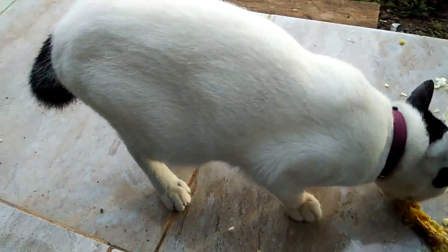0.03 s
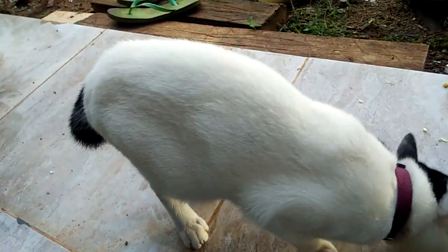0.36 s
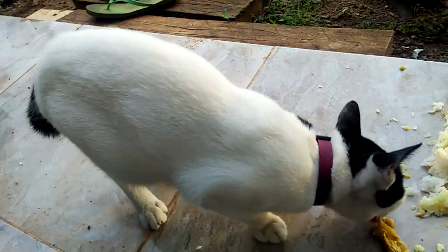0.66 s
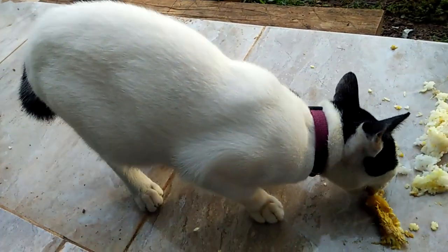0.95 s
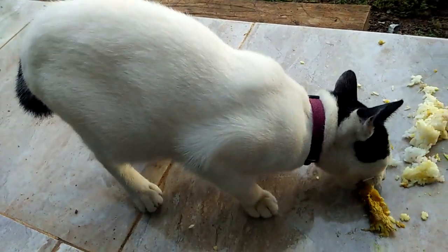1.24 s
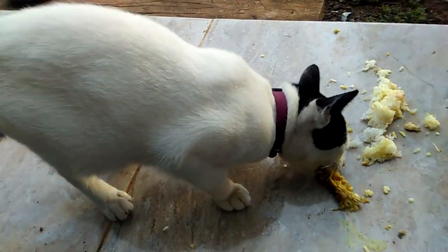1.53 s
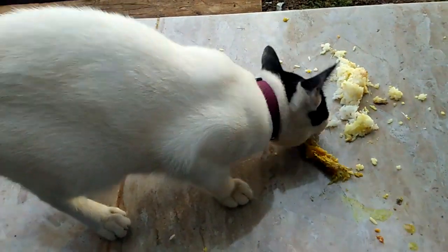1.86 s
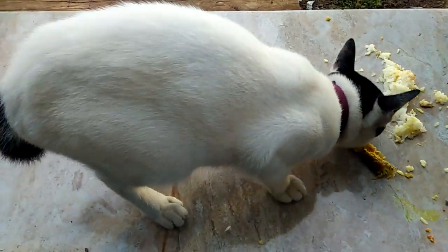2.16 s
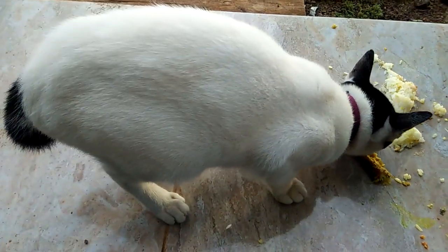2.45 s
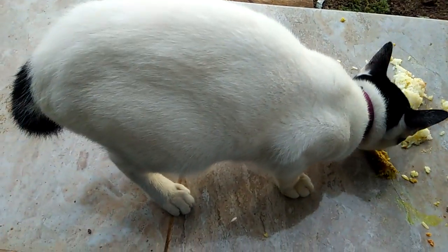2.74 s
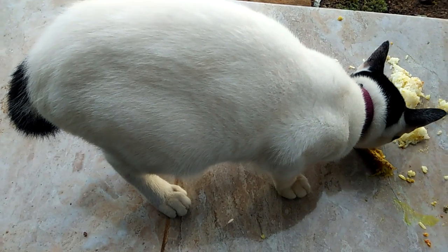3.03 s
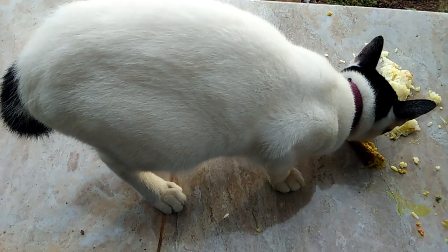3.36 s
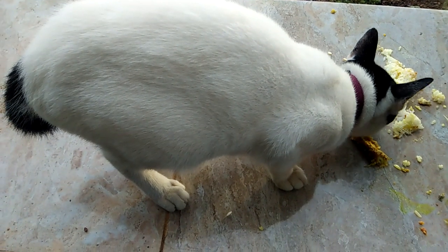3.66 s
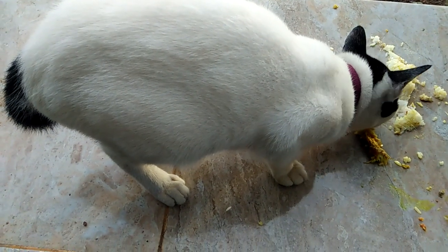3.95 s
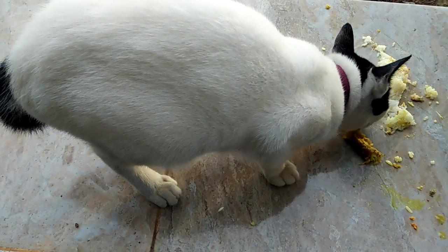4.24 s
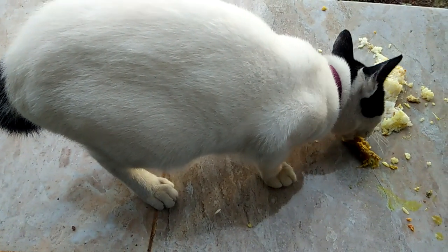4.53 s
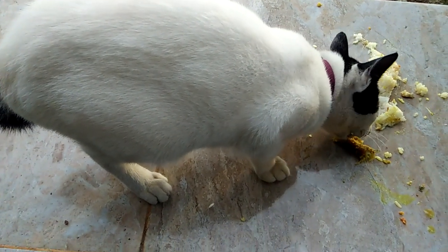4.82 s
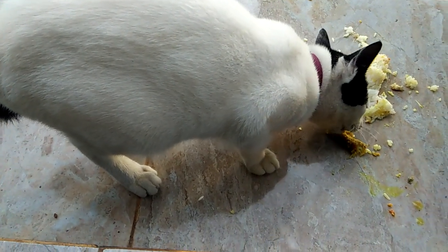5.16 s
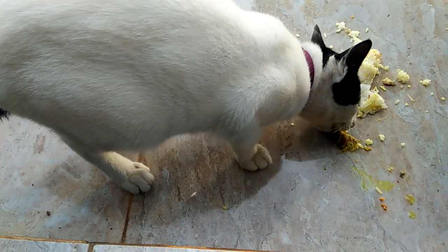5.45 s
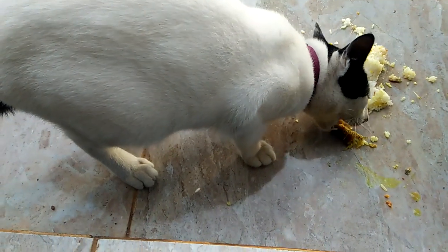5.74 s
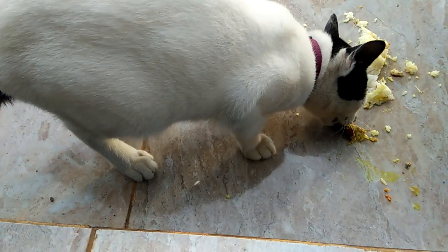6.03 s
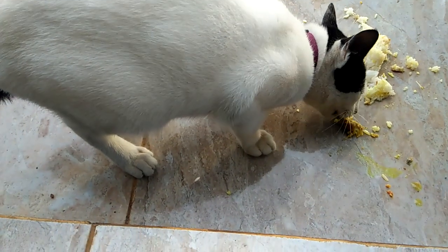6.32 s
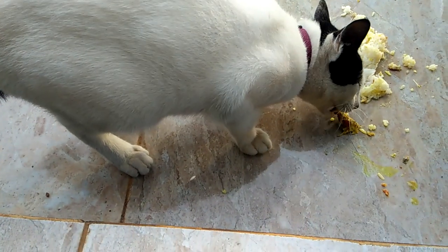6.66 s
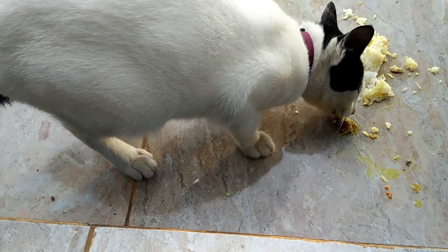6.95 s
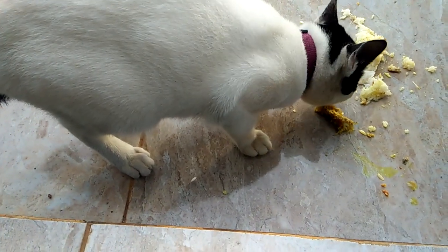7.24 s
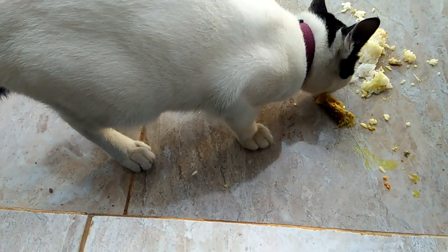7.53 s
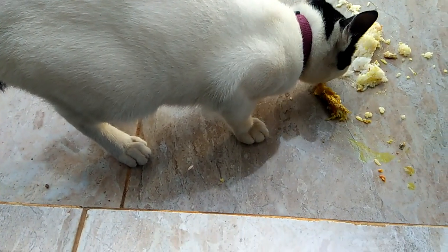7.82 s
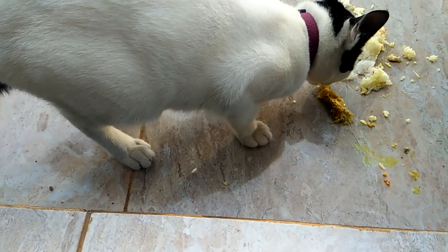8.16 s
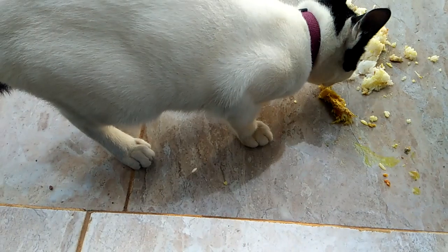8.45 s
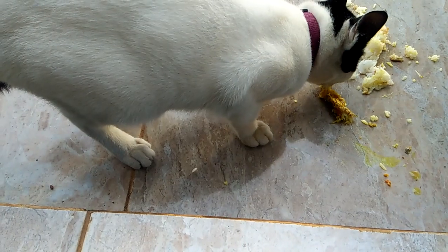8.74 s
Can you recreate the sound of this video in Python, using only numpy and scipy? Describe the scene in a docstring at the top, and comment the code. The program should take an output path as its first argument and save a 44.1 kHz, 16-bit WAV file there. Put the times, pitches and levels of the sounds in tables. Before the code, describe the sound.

Close, wet smacking and nibbling of a cat eating outdoors, with thin bird whistles, quick chirps and a distant rooster.

```python
"""Cat eating corn on a porch

A cat nibbles a corn cob: kernel skins crack in small wet ticks and the lips pop softly. Then comes a
quick run of loud, close tongue smacks, each a wet seal tearing open and ringing the mouth over tiles.
Around the yard two small birds whistle and chip, and a far rooster crows in hoarse, arching tones.
Underneath lie a faint hoot, thin insects, a low rumble and a hiss that swells with every bright sound."""
import sys
import numpy as np
from scipy import signal
from scipy.fft import rfft, irfft, next_fast_len
from scipy.io import wavfile
from scipy.ndimage import uniform_filter1d, minimum_filter1d

SR = 44100
rng = np.random.default_rng(int(sys.argv[2]) if len(sys.argv) > 2 else 0)


def wav_out(sig):
    """Save sig, one row per channel (or a flat mono array), as 16-bit PCM at SR to the path in sys.argv[1]."""
    wavfile.write(sys.argv[1], SR, np.round(np.clip(np.atleast_2d(sig).T, -1, 1) * 32767).astype(np.int16))


N = 387374
TIME = np.arange(N) / SR

# Levels in the tables are relative: each layer has its own gain in the mix.
# Tongue smacks: (snap time [s], lead-in [s], hold [s], level [dB], middle resonance [Hz],
# upper resonance [Hz], low resonance against the middle one [dB], brightness [dB])
TONGUE_SMACKS = [(4.058, 0.00084, 0.012, -27, 3400, 7900, -9.5, 10.5),
                 (4.2431, 0.0017, 0.0087, -37.5, 2670, 7450, -8.5, 19),
                 (4.4126, .008, 0.0073, -36.5, 2590, 7760, -0.5, 9),
                 (4.582, 0.0046, 0.0085, -33, 2470, 7840, -6, -1),
                 (4.75, .004, 0.0047, -36, 2370, 7660, -3.5, 3.5),
                 (4.918, 0.00079, 0.0095, -35.5, 2580, 7460, -2.5, 9),
                 (5.1035, 0.0096, 0.0057, -30, 2510, 6700, -7.5, -4.5),
                 (5.29, 0.012, 0.0041, -31, 2600, 6500, -20.5, -9.5),
                 (5.462, .012, 0.0067, -30, 2660, 6030, -7, -27.5),
                 (5.6295, .003, 0.0045, -36, 2810, 6630, -6.5, 0),
                 (5.812, .007, 0.0049, -32, 2740, 6740, -9, -16),
                 (5.997, 0.00086, 0.0048, -43, 2980, 6950, -3.5, -6.5),
                 (6.093, 0.00028, 0.0013, -47.5, 2350, 8060, -5, 14),
                 (6.211, .007, 0.0037, -32, 2640, 6950, -7, -13.5),
                 (6.407, 0.0094, .003, -35, 2710, 6950, -7.5, 0),
                 (6.5884, 0.0049, 0.0017, -37.5, 2540, 7000, -6, 5.5),
                 (6.781, 0.0053, 0.0022, -35.5, 2820, 7300, -9, -8),
                 (6.981, 0, 0.013, -34.5, 2900, 7300, -46, 1),
                 (7.2, 0.0098, 0.0036, -38.5, 2930, 7400, -12, 3),
                 (7.46, .008, 0.0049, -34.5, 3110, 6960, -15, -17)]
# Low, middle, upper and top resonance of the mouth: (width [Hz])
MOUTH_WIDTHS = [756, 700, 1190, 1370]
# Wide, wet splash of a smack: (frequency [Hz], level [dB])
SPLASH_EQ = [(150, -10), (330, -23), (430, -5), (800, -4.5), (1300, -4.5), (2000, 4.5), (3000, 2),
             (4500, -1), (7500, 5.5), (10000, -9), (14000, -9)]
# Teeth on kernels: (time [s], bright level [dB], dull level [dB])
KERNEL_TICKS = [(0.2279, -50.5, -75), (0.5758, -49.5, -76), (1.1958, -59, -68), (1.5225, -47.5, -57),
                (1.87, -63, -69), (1.8995, -55, -70), (2.225, -60, -74), (2.3612, -48.5, -50),
                (2.4132, -38, -36), (2.723, -63, -80), (3.0423, -51.5, -75), (3.3497, -53.5, -55.5),
                (3.892, -60.5, -74.5), (4.0298, -52.5, -58.5), (4.049, -45.5, -50.5), (4.228, -47, -59),
                (4.9908, -41, -62.5), (5.027, -39.5, -61), (5.054, -47, -66), (5.338, -52, -55),
                (5.647, -43, -39.5), (6.736, -47.5, -62), (7.13, -49, -72), (7.162, -46.5, -74),
                (7.8376, -58.5, -75), (8.0984, -61.5, -70), (8.74, -71, -66)]
# Bright edge and dull body of a tick: (frequency [Hz], level [dB])
TICK_BRIGHT_EQ = [(3000, -20), (5000, -12), (7000, -4.5), (8900, 7.5), (11000, -3), (13000, -7),
                  (14500, -16)]
TICK_DULL_EQ = [(300, -25), (900, -2), (1500, 8), (2100, 0.5), (2700, -3), (3800, -6), (5500, -5.5)]
# Soft pops of the chewing mouth: (time [s], resonance [Hz], level [dB])
LIP_POPS = [(.985, 1530, -65.5), (1.149, 3940, -79), (1.86, 1940, -62.5), (2.972, 3730, -82),
            (3.047, 3660, -74.5), (3.129, 3500, -78.5), (3.33, 1540, -68), (4.765, 4200, -59.5),
            (5.019, 1400, -60.5), (5.184, 3160, -68.5), (7.831, 2400, -76), (8.089, 3100, -66.5)]
# First bird, three phrases of thin whistles: (time [s], top pitch [Hz], level [dB])
WHISTLE_NOTES = [(0.143, 8950, -54.5), (.304, 8750, -49.5), (0.503, 8110, -49), (.713, 7640, -54.5),
                 (0.928, 7560, -59.5), (1.14, 7100, -66), (5.199, 9200, -50), (5.386, 8550, -47),
                 (5.559, 8250, -54), (6.26, 9380, -35.5), (6.44, 9060, -35), (6.595, 8710, -34.5),
                 (6.74, 8630, -34), (6.891, 8610, -31), (7.042, 8610, -33), (7.186, 8650, -32.5),
                 (7.331, 8600, -33), (7.48, 8660, -36)]
# A louder whistle is shorter and falls farther: (level [dB], length [s], fall [share of top pitch])
WHISTLE_BY_LEVEL = [(-54, 0.11, 0.079), (-37, .044, 0.23)]
# Second bird, quick chips: (time [s], top pitch [Hz], level [dB])
CHIP_NOTES = [(5.396, 4500, -65.5), (5.433, 5050, -57), (5.468, 5140, -42), (5.506, 5280, -38.5),
              (5.541, 5310, -37.5), (5.751, 5170, -39), (5.79, 5190, -40), (5.825, 5330, -37),
              (5.863, 5320, -39)]
# Rooster syllables, one whole crow and the start of the next:
# (time [s], length [s], top pitch [Hz], place of the pitch peak [0-1], fundamental [dB], octave [dB])
CROW_SYLLABLES = [(1.07, 0.27, 666, 0.3, -53, -56), (1.34, .23, 739.3, 0.42, -43.5, -56),
                  (1.578, 0.25, 746.3, 0.57, -45, -54), (1.779, .33, 746, .15, -50.5, -52.5),
                  (2.207, .42, 713.4, .45, -54, -56), (8.678, 0.27, 602, 0.6, -52.5, -58)]
# Course of the low hoot: (time [s], pitch [Hz], level [dB])
HOOT_CURVE = [(.15, 290, -97), (.3, 303, -76), (.42, 297, -63), (.58, 293.5, -61), (.68, 293, -58.5),
              (.76, 282, -74)]
# Noise beds of insects, rumble, neighbourhood air and fine hiss: (frequency [Hz], level [dB])
INSECT_EQ = [(3800, -34), (4400, -3), (4780, 0), (5150, -7.5), (5900, -32)]
RUMBLE_EQ = [(12, -56), (20, -34), (34, -23.5), (54, -3.5), (91, -4), (129, -1.5), (147, -3.5), (241, -21),
             (312, -15.5), (336, -26), (380, -42), (490, -85.5), (840, -120)]
AIR_EQ = [(220, -48.5), (370, -19), (430, -4), (693, -4), (750, -3), (1100, -7.5), (1340, -6),
          (3410, -24.5), (3730, -28.5), (4000, -26.5), (5200, -32), (8800, -120)]
HISS_EQ = [(1000, -55.5), (2800, -30), (3900, -26), (4750, -16.5), (5600, -19.5), (6400, -10.5),
           (6740, -0.5), (7100, -12.5), (8200, -6), (9150, 5.5), (10400, -8), (12400, -21.5), (13000, 0.5),
           (13400, -13.5), (14400, -14)]
# Fader rides of the rumble and the air: (time [s], level [dB])
RUMBLE_RIDE = [(0.0, -57), (0.02, -56), (0.59, -60), (0.61, -59), (0.83, -66), (0.88, -57.5), (2.64, -67),
               (3.76, -60), (3.99, -68.5), (4.01, -61), (4.15, -69.5), (5.72, -65), (5.84, -56.5),
               (5.97, -69), (8.39, -61), (8.78, -63.5)]
AIR_RIDE = [(0, -68.5), (1, -67.5), (2.9, -72), (3.7, -70), (4, -67.5), (6.8, -70), (7.1, -65.5),
            (7.4, -71.5), (8.78, -72.5)]
# How the hiss follows bright sounds: (treble level [dB], swell [dB])
SWELL_CURVE = [(-82.5, -16.5), (-62, -7), (-45.5, -2), (-25, -1)]
# Echo tail of the yard: (frequency [Hz], time to fall 60 dB [s])
YARD_DECAY = [(200, .4), (800, .55), (2800, .27), (5000, .34), (8000, .44), (14000, .22)]


def amp(db):
    """Decibels to gain."""
    return 10 ** (np.asarray(db) / 20)


def unit_rms(x):
    """Scales to rms 1."""
    return x / np.sqrt(np.mean(x ** 2) + 1e-20)


def at_hz(points, hz):
    """Reads a curve on a log-frequency axis."""
    f, value = np.transpose(points)
    return np.interp(np.log(hz + 1), np.log(f + 1), value)


def follow(rows):
    """The columns of a time curve at every sample."""
    s, *columns = np.transpose(rows)
    return [np.interp(TIME, s, c) for c in columns]


def add(mix, s, sound):
    """Mixes a sound in at time s."""
    part = mix[max(round(s * SR), 0):][:len(sound)]
    part += sound[:len(part)]


def stereo(mid, side):
    """Mid and side to left and right."""
    return mid + side * np.array([[1], [-1]])


def equalise(x, eq):
    """Minimum-phase EQ: nothing rings ahead of an attack."""
    log_gain = np.log(amp(at_hz(eq, abs(np.fft.fftfreq(2048, 1 / SR)))))
    taps = np.fft.ifft(np.exp(np.conj(signal.hilbert(log_gain)))).real
    return signal.oaconvolve(x, taps)[:len(x)]


def noise(eq):
    """Steady noise with the given spectrum, rms 1."""
    size = next_fast_len(N)
    gain = amp(at_hz(eq, np.fft.rfftfreq(size, 1 / SR)))
    return unit_rms(irfft(rfft(rng.standard_normal(size)) * gain, size)[:N])


def wander(rate_hz):
    """Random modulation up to the given rate, rms 1; it holds still past its last knot."""
    knots = rng.standard_normal(4000)
    return unit_rms(np.interp(2 * rate_hz * TIME, np.arange(len(knots)), knots))


def resonate(x, hz, width_hz):
    """A resonance applied twice, for steep skirts."""
    b, a = signal.iirpeak(min(hz, SR * .45), hz / width_hz, SR)
    return signal.lfilter(b, a, signal.lfilter(b, a, x))


def crackle(t, grain_db):
    """A wet film tearing: noise made of tiny bursts of uneven size."""
    grains = amp(grain_db * np.clip(rng.standard_normal(400), -2, 2))
    return rng.standard_normal(len(t)) * grains[np.arange(len(t)) // 16]


def tongue_smacks(rise_s=0.00021, snap_s=0.001, fall_s=0.0036, fizz_s=0.034, gain_db=-0.5):
    """Air leaks past the tongue, the seal tears open and the mouth rings; saliva fizzes on after."""
    out, size = np.zeros(N), 4410
    for s, lead, hold, db, middle_hz, upper_hz, low_db, bright_db in TONGUE_SMACKS:
        t = np.arange(size) / SR - lead
        after = np.maximum(t, 0)
        leak = amp(-7) * np.sqrt((t + lead) / (lead + 1e-4)) * (t < 0)
        tear = (1 - np.exp(-after / rise_s)) * np.exp(-np.maximum(t - hold, 0) / fall_s)
        snap = 1 + amp(-2.5) * np.exp(-after / snap_s)  # the first instant is the sharpest
        drive = crackle(t, grain_db=3.5) * (leak + tear * snap)
        fizz = crackle(t, grain_db=7) * amp(-19.5) * np.exp(-after / fizz_s) * (t > 0)
        low_hz = 1550 * (1 + 0.13 * rng.standard_normal())
        mouth = [(low_hz, low_db), (middle_hz, 0),
                 (upper_hz, 1 + 0.33 * bright_db), (1.41 * upper_hz, bright_db - 11.5)]
        ring = sum(amp(db + part_db) * unit_rms(resonate(drive, hz, width))
                   for (hz, part_db), width in zip(mouth, MOUTH_WIDTHS))
        splash = amp(-5) * ring.std() * unit_rms(equalise(drive + fizz, SPLASH_EQ))
        add(out, s - lead, (ring + splash) * np.sqrt(.01 * SR / size))  # levels count over 10 ms
    return amp(gain_db) * out


def kernel_ticks(crack_s=0.0051, wet_db=-23, wet_s=0.021):
    """A kernel skin breaks: a sharp tick and a short wet fizz."""
    out, t = np.zeros(N), np.arange(2205) / SR
    for s, bright_db, dull_db in KERNEL_TICKS:
        drive = crackle(t, grain_db=4) * (np.exp(-t / crack_s) + amp(wet_db) * np.exp(-t / wet_s))
        edge = amp(bright_db - 1) * unit_rms(equalise(drive, TICK_BRIGHT_EQ))
        body = amp(dull_db - 3) * unit_rms(equalise(drive, TICK_DULL_EQ))
        add(out, s, (edge + body) * np.sqrt(.005 / t[-1]))  # levels count over 5 ms
    return out


def lip_pops(length_s=0.035, width_hz=750):
    """Lips and tongue part softly and sound one resonance of the mouth."""
    out, u = np.zeros(N), np.linspace(0, 1, int(length_s * SR))
    for s, hz, db in LIP_POPS:
        parting = crackle(u, grain_db=3) * np.sin(np.pi * np.sqrt(u)) ** 2
        add(out, s, amp(db) * unit_rms(resonate(parting, hz, width_hz)))
    return out


def nibbles(per_s=36, gain_db=-58, spread_db=4, width_hz=1300, bands=9):
    """Moist chewing: a sprinkle of tiny, high clicks of different pitch."""
    out = np.zeros(N)
    for hz in np.linspace(7000, 12500, bands):
        hits = rng.random(N) < per_s / bands / SR
        sizes = amp(np.minimum(spread_db * rng.exponential(1, N), 15))
        out += resonate(hits * sizes, hz, width_hz) * SR / (np.pi * width_hz)
    return out * amp(gain_db)


def bird_whistles(crest=0.097, bend=1.9, waver=0.012, flutter_db=4):
    """A small bird's thin, fluttering notes: each lifts briefly to its top and bends down."""
    out = np.zeros(N)
    pitch_waver = 1 + waver * wander(310)
    flutter = amp(flutter_db * wander(140))
    levels, lengths, falls = np.transpose(WHISTLE_BY_LEVEL)
    for s, top_hz, db in WHISTLE_NOTES:
        u = np.linspace(0, 1, int(np.interp(db, levels, lengths) * SR))
        now = slice(int(s * SR), int(s * SR) + len(u))
        droop = np.interp(db, levels, falls) * abs((u - crest) / (1 - crest)) ** bend
        hz = top_hz * (1 - droop) * pitch_waver[now]
        envelope = np.sin(np.pi * u ** 0.81) * flutter[now]
        add(out, s, amp(db) * unit_rms(envelope * np.sin(2 * np.pi * np.cumsum(hz) / SR)))
    return out


def bird_chips(length_s=0.025, drop=0.2, linger=0.47, octave_db=-14, flutter_db=2):
    """A second bird's quick downward sweeps, lingering halfway, with a weak octave."""
    out, u = np.zeros(N), np.linspace(0, 1, int(length_s * SR))
    fall = u + linger * np.sin(2 * np.pi * u) / (2 * np.pi)
    for s, top_hz, db in CHIP_NOTES:
        phase = 2 * np.pi * np.cumsum(top_hz * (1 - drop * fall)) / SR
        tone = np.sin(phase) + amp(octave_db) * np.sin(2 * phase)
        add(out, s, amp(db) * unit_rms(np.sin(np.pi * u) * tone))
    return out * amp(flutter_db * wander(110))


def rooster(arch=0.0644, jitter=0.0317, rasp=0.6, attack_s=0.018, release_s=0.12, fade_db=-2):
    """Hoarse syllables that arch in pitch; only two harmonics carry across the distance."""
    out = np.zeros(N)
    unsteady = 1 + jitter * wander(60)
    uneven = amp(-13) * wander(80)  # uneven pulses put a weak tone between the harmonics
    throat = amp(-18) * unit_rms(resonate(rng.standard_normal(N), hz=1660, width_hz=800))
    for s, length, top_hz, peak, first_db, octave_db in CROW_SYLLABLES:
        now = (TIME >= s) & (TIME < s + length)
        t = TIME[now] - s
        hz = top_hz * (1 - arch * (2 * (t / length - peak)) ** 2)
        phase = 2 * np.pi * np.cumsum(hz * unsteady[now]) / SR
        upper = np.sin(2 * phase) + uneven[now] * np.sin(1.5 * phase) + throat[now]
        gate = np.minimum(np.minimum(t / attack_s, (length - t) / release_s), 1)
        envelope = gate * amp(fade_db * t / length)
        out[now] += envelope * (amp(first_db) * np.sin(phase) + amp(octave_db) * upper)
    return np.sqrt(2) * out * (1 + rasp * wander(150))


def hoot(jitter=0.046, flutter_db=3, fade_s=0.019):
    """A soft, unsteady far tone."""
    hz, db = follow(HOOT_CURVE)
    tone = np.sin(2 * np.pi * np.cumsum(hz * (1 + jitter * wander(33.7))) / SR)
    start, end = HOOT_CURVE[0][0], HOOT_CURVE[-1][0]
    gate = np.clip(np.minimum(TIME - start, end - TIME) / fade_s, 0, 1)
    return np.sqrt(2) * amp(db + flutter_db * wander(20.3)) * tone * gate


def insects(swell_db, gain_db=-81, throb_db=4):
    """Many far insects merge into one softly throbbing band, which swells a little with the hiss."""
    return noise(INSECT_EQ) * amp(gain_db + 0.56 * swell_db + throb_db * wander(25))


def ambience(swell_db, lumps_db=2.5, hiss_db=-59.5, flicker_db=2):
    """Lumpy low rumble, the air of the neighbourhood, and a slightly wide hiss that swells and sinks."""
    rumble = noise(RUMBLE_EQ) * amp(follow(RUMBLE_RIDE)[0] - 1 + lumps_db * wander(9))
    air = noise(AIR_EQ) * amp(follow(AIR_RIDE)[0] + .8 * wander(10))
    hiss = stereo(noise(HISS_EQ), amp(-12) * noise(HISS_EQ))
    return rumble + air + hiss * amp(hiss_db + swell_db + flicker_db * wander(37))


def swell(x, smooth_s=0.021, hold_s=0.047, fall_db_per_s=121.5):
    """Envelope follower: a gain in dB that rises with the treble of x, holds, and sinks in the pauses."""
    treble = signal.sosfilt(signal.butter(4, 3000, "high", fs=SR, output="sos"), x)
    treble_db = 10 * np.log10(abs(uniform_filter1d(treble ** 2, size=441)) + 1e-12)
    target = np.interp(treble_db, *np.transpose(SWELL_CURVE))
    size = int(hold_s * SR)
    held = -minimum_filter1d(-target, size, origin=(size - 1) // 2)
    fall = fall_db_per_s * TIME
    db = np.maximum.accumulate(held + fall) - fall
    pole = np.exp(-1 / (smooth_s * SR))
    return db[0] + signal.lfilter([1 - pole], [1, -pole], db - db[0])


def tile_bounce(x, delay_s=0.0028, bounce_db=-10):
    """The hard floor returns a near sound a moment later."""
    return x + amp(bounce_db) * np.interp(TIME - delay_s, TIME, x, left=0)


def yard_echo(x, predelay_s=0.009, side_db=-17, wide_above_hz=4500):
    """Scattered echoes from walls and plants; only their treble differs between the ears."""
    taps = rng.standard_normal((2, SR)) * (rng.random((2, SR)) < .1) * (TIME[:SR] > predelay_s)
    hz, t, bands = signal.stft(taps, SR, nperseg=256)
    bands *= amp(-60 * t / at_hz(YARD_DECAY, hz)[:, None])
    bands[1] *= (hz > wide_above_hz)[:, None]
    tails = signal.istft(bands, SR, nperseg=256)[1]
    mid, side = signal.oaconvolve(x[None], tails / np.linalg.norm(tails[0]), axes=1)[:, :N]
    return stereo(mid, amp(side_db) * side)


def scene():
    """The cat sits close and almost dry; the farther a bird, the more of it is echo."""
    smacks = tile_bounce(tongue_smacks())
    chewing = kernel_ticks() + lip_pops()
    whistles, chips, crow = bird_whistles(), bird_chips(), rooster()
    bright = smacks + chewing + amp(-9) * whistles + amp(-1.5) * chips
    swell_db = swell(bright)
    direct = bright + amp(-7) * crow + hoot()
    send = amp(-21.5) * smacks + amp(-15.5) * (chewing + chips) + amp(-11.5) * whistles + amp(-8) * crow
    return direct + yard_echo(send) + nibbles() * amp(swell_db) + ambience(swell_db) + insects(swell_db)


def record(dry, width_db=-19, wide_above_hz=6000, cutoff_hz=14450):
    """A phase shift widens the high treble slightly; a steep low-pass trims the top."""
    highpass = signal.butter(6, wide_above_hz, "high", fs=SR, output="sos")
    treble = signal.sosfilt(highpass, dry.mean(0))
    treble = signal.sosfilt(highpass, treble[::-1])[::-1]  # the backward pass cancels the delay
    side = amp(width_db) * signal.hilbert(treble, next_fast_len(N)).imag[:N]
    lowpass = signal.firwin(255, cutoff_hz, window=("kaiser", 8), fs=SR)
    return signal.oaconvolve(stereo(dry, side), lowpass[None], "same")


dry = scene()
out = record(dry)
wav_out(out)
```